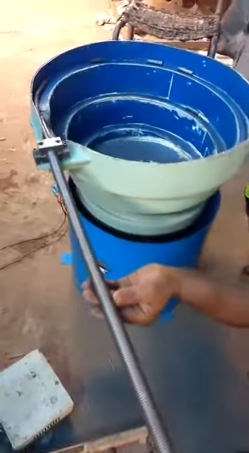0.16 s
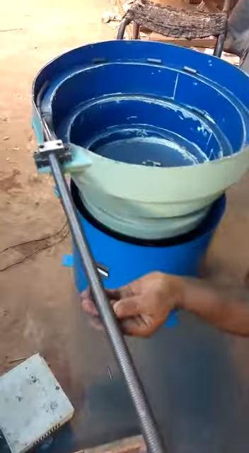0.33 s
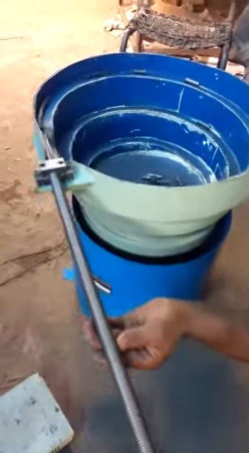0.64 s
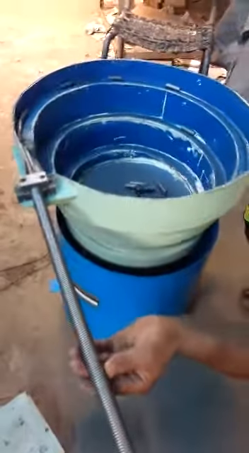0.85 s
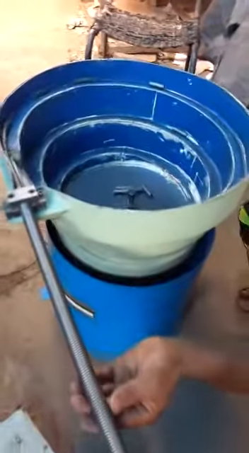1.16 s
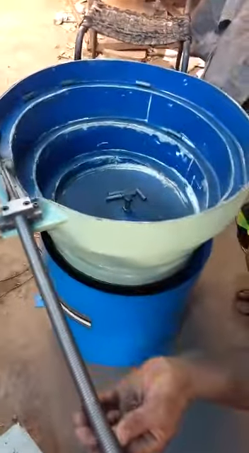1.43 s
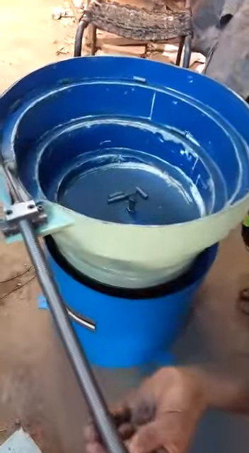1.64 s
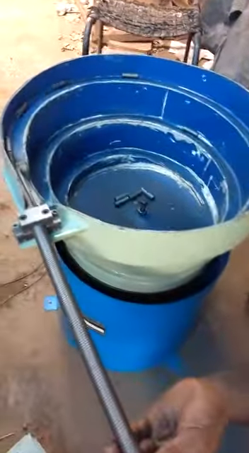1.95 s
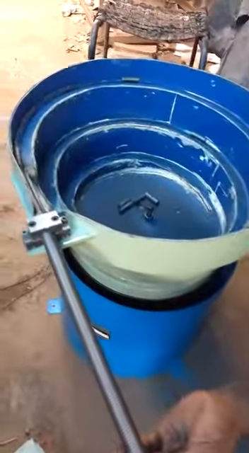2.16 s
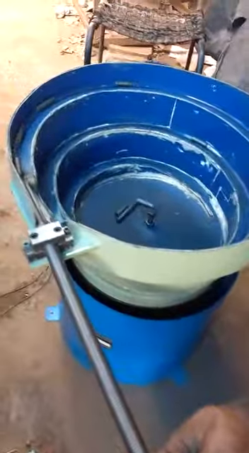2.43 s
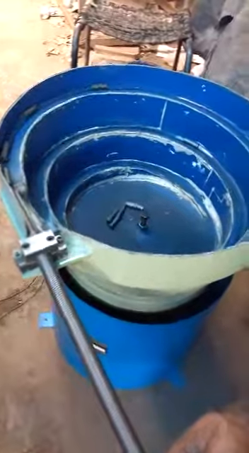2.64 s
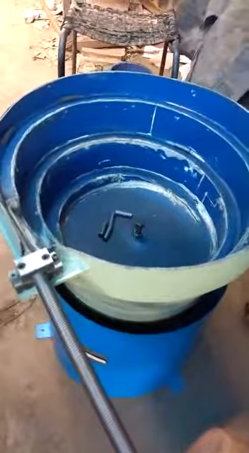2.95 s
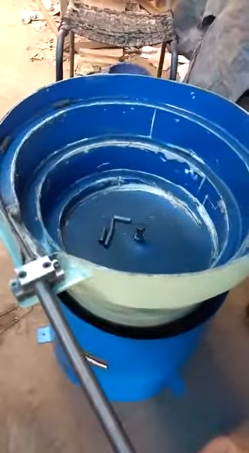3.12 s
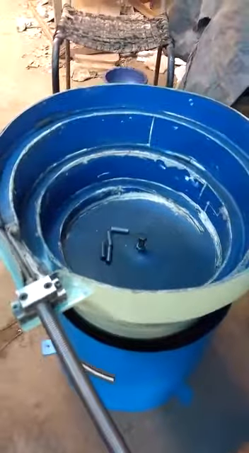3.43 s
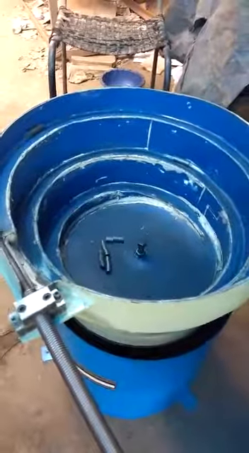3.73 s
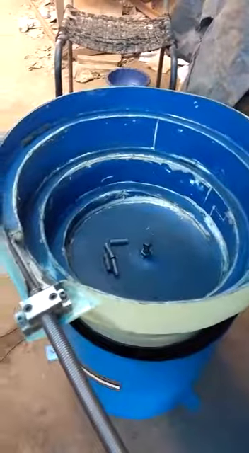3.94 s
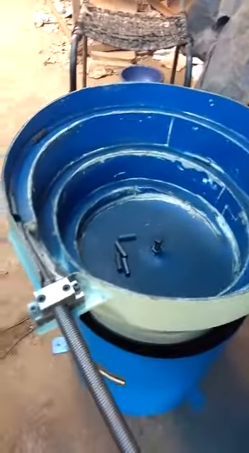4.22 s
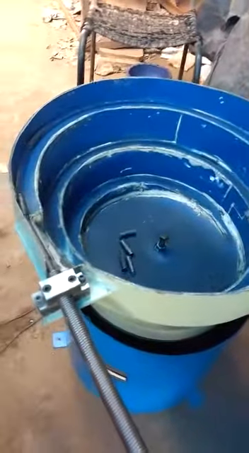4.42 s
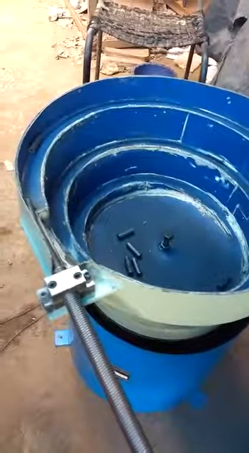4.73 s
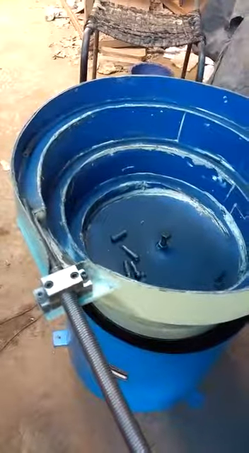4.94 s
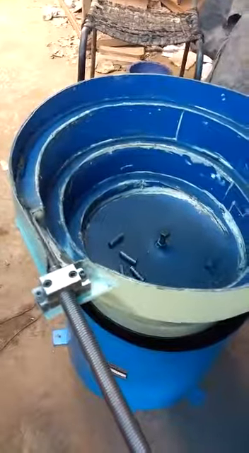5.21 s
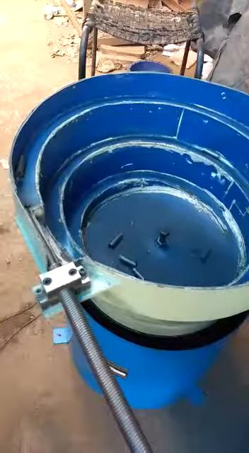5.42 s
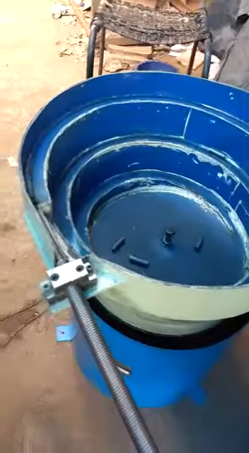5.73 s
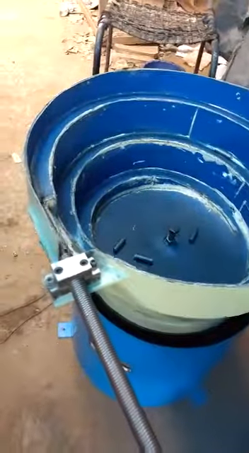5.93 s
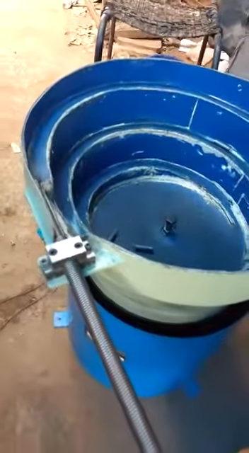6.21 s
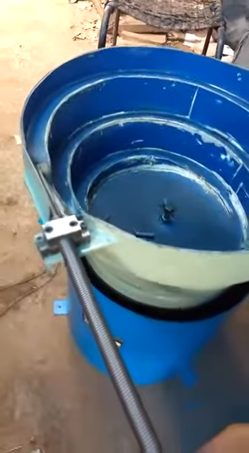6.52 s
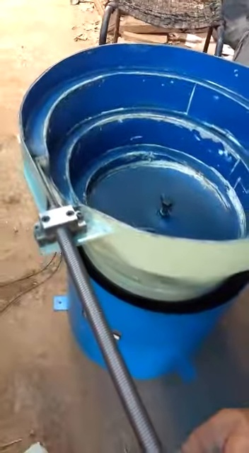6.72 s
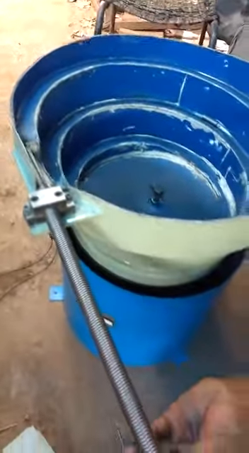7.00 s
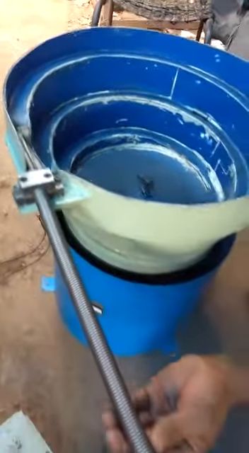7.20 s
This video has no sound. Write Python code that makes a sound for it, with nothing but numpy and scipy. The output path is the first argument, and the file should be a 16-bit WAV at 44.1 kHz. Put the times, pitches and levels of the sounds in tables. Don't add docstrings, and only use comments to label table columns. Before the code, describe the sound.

Steady mains-rate buzzing and a grainy rattle of small steel pins in a bowl run throughout. Hard metallic clacks land on a tray toward the right, followed by little bounces and very short diffuse tails. A tight cluster comes around six seconds, with a faint sinking tone as one pin spins to rest. The handheld microphone's gain pumps down at loud hits.

```python
import sys
import numpy as np
from scipy import signal
from scipy.fft import rfft, irfft
from scipy.io import wavfile
from scipy.ndimage import uniform_filter1d

SR = 44100
rng = np.random.default_rng(int(sys.argv[2]) if len(sys.argv) > 2 else 0)


def gain_from_db(level_db):
    decades = np.asarray(level_db, float) / 20
    return 10 ** decades


def log_audio(samples):
    frames = np.atleast_2d(samples).T
    limited = np.clip(frames, -1, 1)
    pcm = np.round(limited * 32767).astype(np.int16)
    wavfile.write(sys.argv[1], SR, pcm)


N = 324576
MAINS_HZ = 49.92


def rms_one(x):
    return x / np.sqrt(np.mean(x ** 2) + 1e-20)


def at_hz(points, hz):
    table = np.array(points)
    return np.interp(np.log(np.maximum(hz, 1)), np.log(table[:, 0]), table[:, 1])


def drift(rate):
    r = np.exp(-80 * np.pi * rate / SR)
    slow = signal.lfilter([1], [1, -2 * r, r * r], rng.standard_normal(N // 40 + 2002))[2000:]
    return np.interp(np.arange(N) / 40, np.arange(len(slow)), rms_one(slow - slow.mean()))


def ring(clicks, hz, t60):
    r, w = gain_from_db(-60 / (t60 * SR)), 2 * np.pi * hz / SR
    return signal.lfilter([0, np.sin(w)], [1, -2 * r * np.cos(w), r * r], clicks + 1e-18)


def resonate(x, hz, width_hz):
    r = np.exp(-np.pi * width_hz / SR)
    poles = [1, -2 * r * np.cos(2 * np.pi * hz / SR), r * r]
    return signal.lfilter([(1 - r * r) / 2, 0, (r * r - 1) / 2], poles, x)


# f/Hz, likeness/0-1
LIKENESS = [(40, 0), (150, 0.74), (1000, 0.2), (2500, 0), (5000, 0.01), (14000, 0)]


def two_ports(first, second):
    alike = np.clip(at_hz(LIKENESS, np.fft.rfftfreq(N, 1 / SR)), 0, 1)
    mid = rfft(first) * np.sqrt((1 + alike) / 2)
    side = rfft(second) * np.sqrt((1 - alike) / 2)
    return irfft(np.array([mid + side, mid - side]), N)


# multiple of the mains/1, level/dB
HUM = [(1, -52), (2, -23), (3, -16.5), (4, -3), (5, -12), (7, -10), (8, -13), (10, -16.5), (11, -29)]


def hum(level_db):
    t, out = np.arange(N) / SR, np.zeros((2, N))
    for multiple, db in HUM:
        start, skew = rng.uniform(0, 2 * np.pi), rng.normal(0, 0.27)
        turn = 2 * np.pi * MAINS_HZ * multiple * t + start + 0.37 * drift(1.7)
        ports = np.sin(turn + skew * np.array([[1], [-1]]))
        out += gain_from_db(db + 0.86 * drift(2.2)) * ports
    return np.sqrt(2) * gain_from_db(level_db) * out


def hops(per_s, spread_db, beat_db):
    turn = 2 * np.pi * MAINS_HZ * np.arange(N) / SR
    stroke_db = beat_db * (np.cos(2 * turn + drift(6.0)) + 1.02 * np.cos(turn + 0.5 * drift(0.34)))
    born = rng.random((2, N)) < per_s / SR
    sizes = gain_from_db(spread_db * np.minimum(rng.exponential(1, (2, N)), 4))
    sizes = sizes * rng.choice([-1, 1], (2, N))
    bunch_db = 1.2 * drift(25) + 0.6 * drift(6)
    return rms_one(born * sizes * gain_from_db(stroke_db + bunch_db))


# f/Hz, width/Hz, level/dB
BOWL = [(229.6, 6.8, 9.5), (382, 53, 2.5), (473, 28, -5.5), (539, 19.5, 5.5), (734.5, 16.3, -2.5),
        (1003.6, 12.4, 4), (1244, 27, -7), (1247, 71, -13), (1572, 42, 0.5), (2018, 30, 1)]
# f/Hz, spectral level/dB
RATTLE = [(30, 2), (50, 4), (120, 5), (300, 1), (800, 6.5), (2000, 0), (2600, -6), (3500, -5), (5500, -7.5),
          (7200, -12.5), (9000, -12), (12000, -19.5), (14800, -32.5), (15700, -45)]


def rattle(bowl_db, chatter_db):
    hz = np.fft.rfftfreq(N, 1 / SR)
    colour = gain_from_db(at_hz(RATTLE, hz))
    low = 1 / (1 + (hz / 2600) ** 6)
    knocks = hops(9000, spread_db=3.0, beat_db=1.5)
    wall = np.zeros((2, N))
    for k, (f, width_hz, db) in enumerate(BOWL):
        wall += gain_from_db(db) * resonate(knocks, f, width_hz) * (-1) ** k
    bowl = rms_one(irfft(rfft(knocks + gain_from_db(9.0) * wall) * colour * low, N))
    scrapes = hops(7000, spread_db=1.0, beat_db=1.5)
    track = rms_one(irfft(rfft(scrapes) * colour * (1 - low), N))
    return gain_from_db(bowl_db - 8.0) * two_ports(*bowl) + gain_from_db(chatter_db + 4.5) * two_ports(*track)


# t/s, gain left/dB
DUCKS = [
    (0.0, -12.5),
    (0.249, -15),
    (1.932, -15),
    (3.208, -19.5),
    (3.988, -19.5),
    (4.619, -18.5),
    (5.14, -19),
    (6.35, -8.5),
    (6.873, -15),
]


def ducking_db():
    recover_db_per_s, dip_db, dip_s, grab_s = 10, 10, 0.011, 0.0025
    t = np.arange(N) / SR
    s, left_db = np.transpose(DUCKS)
    last = np.maximum(np.searchsorted(s, t, side="right") - 1, 0)
    since = t - s[last]
    overshoot_db = dip_db * np.exp(-since / dip_s) * (last > 0)
    gain_db = left_db[last] + recover_db_per_s * since - overshoot_db
    return uniform_filter1d(gain_db, 1 + int(grab_s * SR))


# t/s, lift of the rattle/dB
CROWD = [(0, 5.5), (.2, 0.5), (.6, 0.5), (1.0, 1.5), (1.55, -1), (1.7, 2.5), (1.92, -0.5), (2.6, -1),
         (3.2, 0.5), (3.9, 1.5), (4.5, 1), (5.1, 0), (5.7, 0.5), (6.0, 2.5), (6.15, 4.5), (6.5, -0.5),
         (6.9, 1.5), (7.36, -0.5)]
# f/Hz, level difference/dB
LEAN = [(60, -1), (160, -2), (350, 7.5), (740, -0.5), (1600, -11), (3300, -5.5), (5500, -6.5), (9000, 5.5),
        (15000, -16)]


def machine():
    hum_db, bowl_db, chatter_db = -31, -21.5, -36
    gain_db = ducking_db()
    crowd_db = np.interp(np.arange(N) / SR, *np.transpose(CROWD))
    pins = rattle(bowl_db + gain_db + 0.54 * crowd_db, chatter_db + gain_db + crowd_db)
    lean_db = at_hz(LEAN, np.fft.rfftfreq(N, 1 / SR)) * np.array([[0.5], [-0.5]])
    return irfft(rfft(hum(hum_db + gain_db) + pins) * gain_from_db(lean_db), N)


# t/s, strength/dB, weight/dB, brightness/dB, crack/dB
LANDINGS = [(0.0452, -26, -31, 1, -63), (0.247, -17.5, 1, -2.5, -8), (1.9298, -17, -1, -10.5, -28),
            (2.1585, -23, 3, -14.5, -35), (2.2304, -33.5, -3, -1, -32), (3.2026, -16.5, -2, 0.5, -53),
            (3.453, -22.5, -8, -16, -46), (3.6016, -25, -65, -9.5, -37), (3.9846, -25, -2, 11, -17),
            (4.2072, -41.5, 5, 13.5, -36), (4.6165, -25, 5, 9.5, -21.5), (5.1384, -23.5, -3.5, 9.5, -13),
            (6.0098, -15.5, 5.5, -10.5, -63), (6.0984, -21.5, -8, -11, -45), (6.2104, -22.5, -5, -25, -18),
            (6.3492, -21.5, -13, 0.5, -54), (6.4348, -23.5, -7, -8.5, -31), (6.8698, -15.5, 5, -12.5, -55),
            (7.0712, -28, 2.5, -7, -28), (7.2827, -29, -2, 9.5, -34.5)]
# t/s, strength/dB, brightness/dB
BOUNCES = [(0.3274, -38, -1), (0.3418, -33.5, -1.5), (0.3614, -35.5, -6), (0.382, -39, -4),
           (1.6571, -48, 16), (2.1844, -33, -15), (2.2651, -40.5, -3), (3.5135, -35, -18), (3.6491, -41, 0),
           (4.0802, -43, 11), (4.1505, -34.5, -19), (4.7609, -38, -25), (4.7903, -33.5, -9),
           (4.8102, -45.5, 0), (4.8396, -40.5, -5), (4.8744, -51.5, 4), (5.3016, -33, -22),
           (5.3958, -32.5, -9), (5.455, -39.5, -1.5), (6.128, -39, -8), (6.4724, -27.5, -19),
           (7.1121, -27, -17.5), (7.1832, -33, -26), (7.213, -42, -16), (7.3332, -34.5, 6)]


def all_clacks():
    bounces = [(s, db, 0, bright_db, db - 3.5) for s, db, bright_db in BOUNCES]
    return np.array(list(LANDINGS) + bounces)


CLACK_BAND_HZ = [450, 850, 1900, 3700, 9000]


def clack_db(hz):
    levels = []
    for s, db, weight_db, bright_db, crack_db in all_clacks():
        knock_db = db + 6 + 0.39 * bright_db
        bands_db = [db + weight_db, db, knock_db, db + bright_db, crack_db]
        levels.append(at_hz(np.c_[CLACK_BAND_HZ, bands_db], hz))
    return np.array(levels)


# f/Hz, t60/s
SHED = [(400, 0.09), (1000, 0.21), (2000, 0.2), (3800, 0.22), (7000, 0.037)]


def shed(level_db):
    at = (all_clacks()[:, 0] * SR).astype(int)
    white = [two_ports(*rng.standard_normal((2, N))) for k in (0, 1)]
    edges, out = np.geomspace(300, 8000, 11), np.zeros((2, N))
    swell = np.exp(-1 / (0.00053 * SR))
    for k, (low, high) in enumerate(zip(edges, edges[1:])):
        hz = np.sqrt(low * high)
        power = np.zeros(N)
        power[at] = gain_from_db(2 * (clack_db(hz) + level_db))
        decay = gain_from_db(-120 / (at_hz(SHED, hz) * SR))
        power = signal.lfilter([1], [1, -decay], power + 1e-18)
        power = signal.lfilter([1 - swell], [1, -swell], power)
        sos = signal.butter(2, [low, high], "band", fs=SR, output="sos")
        out += np.sqrt(power) * rms_one(signal.sosfilt(sos, white[k % 2]))
    return out


# t/s, f/Hz, level/dB
SPIN = [
    (6.23, 500, -39),
    (6.248, 527, -32),
    (6.304, 529, -51),
    (6.345, 572, -39),
    (6.468, 471.6, -39),
    (6.516, 493, -33.5),
    (6.56, 473, -52),
]


def spin():
    s, pitch_hz, level_db = np.transpose(SPIN)
    t = np.arange(N) / SR
    fade = np.clip(np.minimum(t - s[0], s[-1] - t) / 0.033, 0, 1)
    wavering_hz = np.interp(t, s, pitch_hz) * (1 + 0.0026 * drift(32))
    turn = 2 * np.pi * np.cumsum(wavering_hz) / SR
    return np.sqrt(2) * fade * gain_from_db(np.interp(t, s, level_db) + 2.1 * drift(15)) * np.sin(turn)


# f/Hz, level/dB, t60/s
TRAY = [(318, -9, 0.013), (500, -2.5, 0.027), (585, -10, 0.032), (795, 0.5, 0.039), (983, -1.5, 0.039),
        (1163, -9, 0.03), (1347, -7, 0.054), (1625, -1, 0.024), (1756, -6.5, 0.039), (1900, 2.5, 0.018),
        (2170, 3.5, 0.015), (2500, 3, 0.022), (2765, 5, 0.005), (3090, 0.5, 0.012), (3320, -4.5, 0.037),
        (3623, 3.5, 0.007), (3688, 1, 0.019), (4073, -5, 0.037), (4470, -7, 0.023), (5220, -7.5, 0.021)]
FLAT_S = [
    1.93,
    2.16,
    6.87,
]


def clacks():
    rows = all_clacks()
    count = len(rows)
    share = np.sort(rng.random((count, 12)), axis=1)
    share -= share[:, :1]
    size = (0.64 + 3.6 * share) * np.exp(-3.5 * share) * rng.choice([-1, 1], (count, 12))
    size /= np.sqrt(np.sum(size ** 2, axis=1, keepdims=True))
    flat = np.abs(rows[:, :1] - FLAT_S).min(axis=1, keepdims=True) < 0.01
    share = share * np.where(flat, 0.43, 1)
    slap = gain_from_db(2 * flat)
    at = np.minimum(((rows[:, :1] + share * 0.006) * SR).astype(int), N - 20)
    lag = rng.integers(11, 14, (count, 1))
    luck = rng.normal(0, 1, (count, len(TRAY), 14))

    out = np.zeros((2, N))
    for k, (hz, db, t60) in enumerate(TRAY):
        clicks = np.zeros((2, N))
        strike = size * gain_from_db(3 * luck[:, k, 2:])
        strike /= np.sqrt(np.sum(strike ** 2, axis=1, keepdims=True))
        for port in (0, 1):
            scatter_db = 1.5 * luck[:, k, port]
            gain = gain_from_db(clack_db(hz) + db + 4 + 6.75 * port + scatter_db)
            np.add.at(clicks[port], at + (1 - port) * lag, gain[:, None] * strike * slap)
        out += ring(clicks, hz, t60 * 0.85) * (-1) ** k

    ticks = np.zeros(N)
    np.add.at(ticks, at, gain_from_db(rows[:, 4:] - 18) * np.abs(size))
    fade = np.exp(-1 / (0.00041 * SR))
    crack = signal.lfilter([1], [1, -fade], ticks) * two_ports(*rng.standard_normal((2, N)))
    out = signal.sosfilt(signal.butter(2, 260, "high", fs=SR, output="sos"), out)
    return out + signal.sosfilt(signal.butter(2, [4500, 11000], "band", fs=SR, output="sos"), crack)


def scene():
    return machine() + shed(level_db=-10.0) + spin() + clacks()


def roll_off(x):
    return signal.sosfilt(signal.butter(12, 16150, fs=SR, output="sos"), x)


# f/Hz, share/0-1
CROSS = [(200, .08), (600, .4), (1150, .85), (2430, .995), (3650, .7), (5000, .58), (7600, .72),
         (10300, .55), (13000, .6)]


def record(dry):
    delay_s, turn_rad, top_hz = 0.000384, 0.37, 15550
    hz = np.fft.rfftfreq(N, 1 / SR)
    phase = 2 * np.pi * hz * delay_s + turn_rad
    cross = np.clip(at_hz(CROSS, hz), 0, 1) * np.exp(-1j * phase)
    ports = rfft(dry)
    wide = np.clip(irfft(ports - cross * ports[::-1], N), -1, 1)
    wide = signal.sosfilt(signal.cheby2(10, 50, 1.04 * top_hz, fs=SR, output="sos"), wide)
    wide = signal.sosfilt(signal.butter(2, 35, "high", fs=SR, output="sos"), wide)
    return roll_off(wide)


dry = scene()
out = record(dry)
log_audio(out)
```